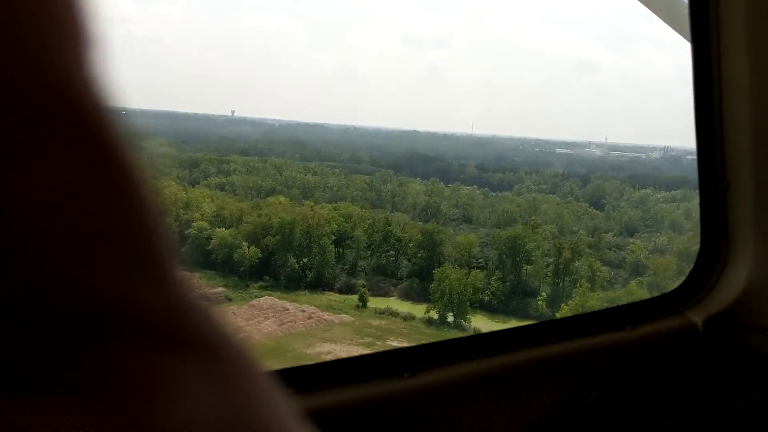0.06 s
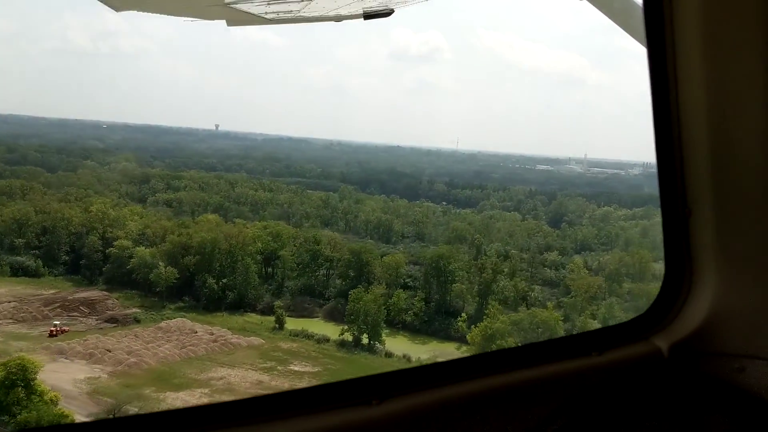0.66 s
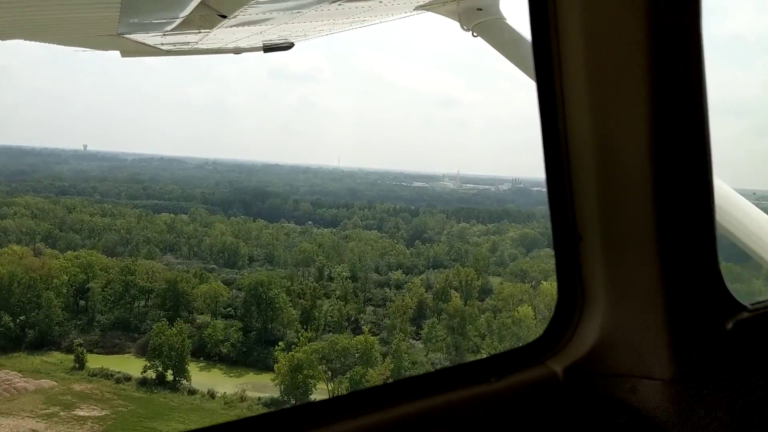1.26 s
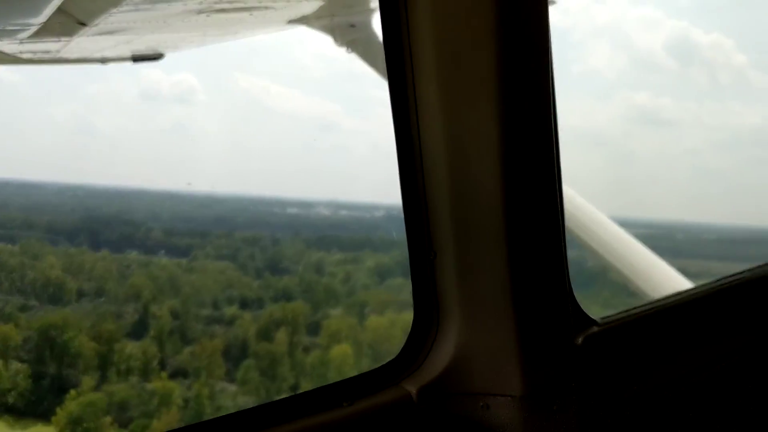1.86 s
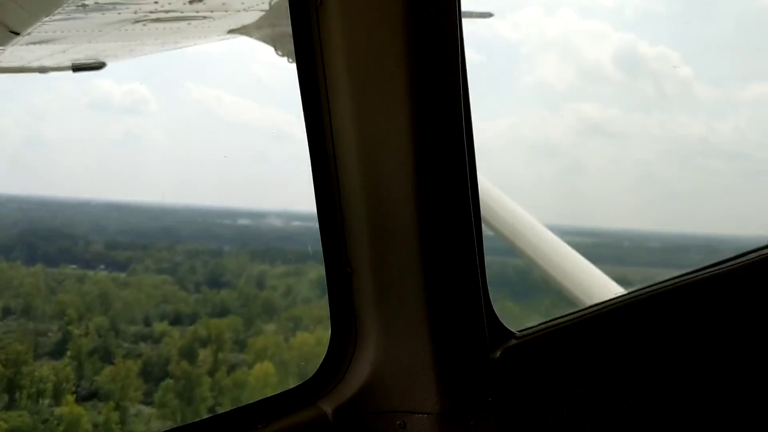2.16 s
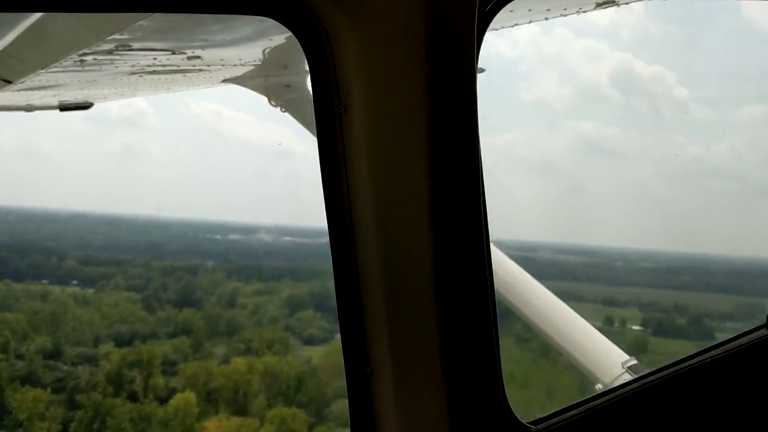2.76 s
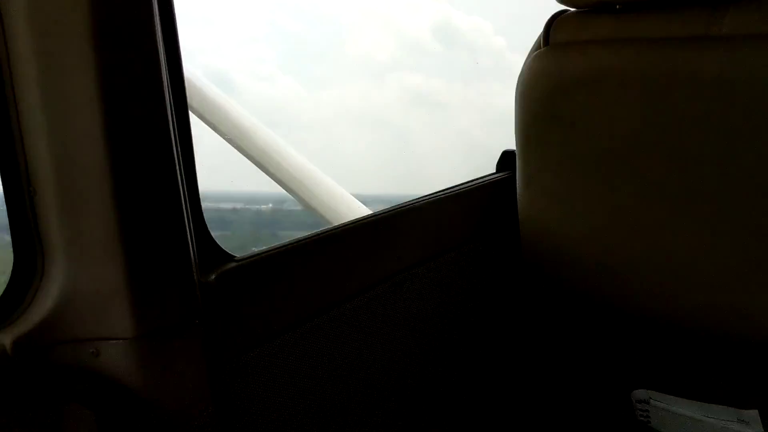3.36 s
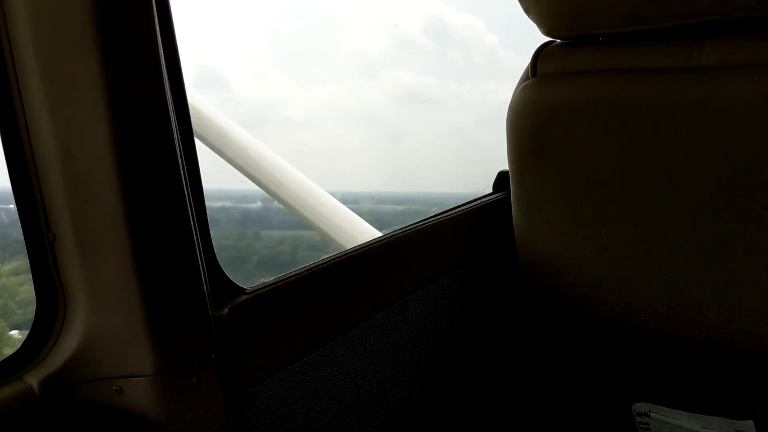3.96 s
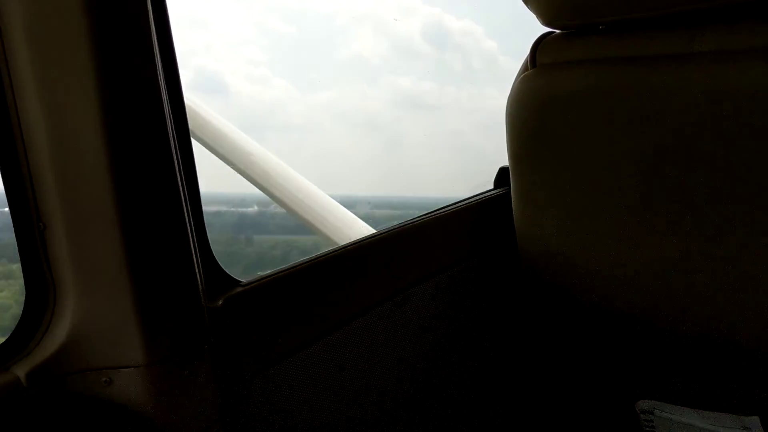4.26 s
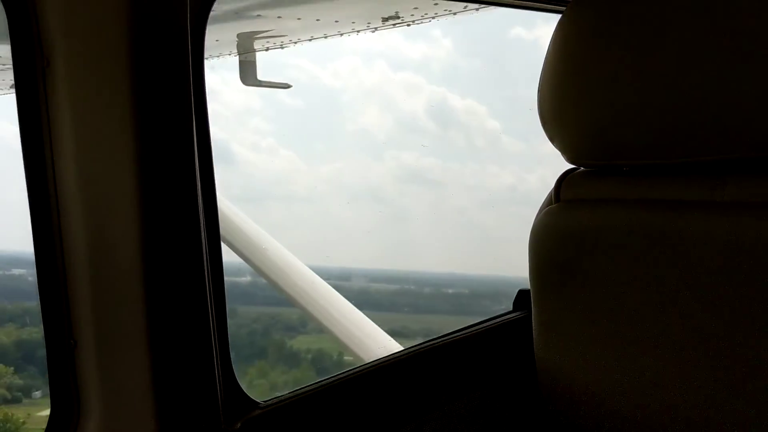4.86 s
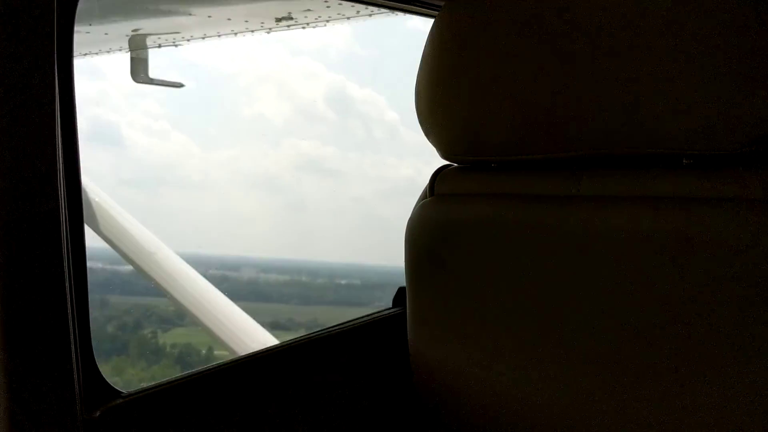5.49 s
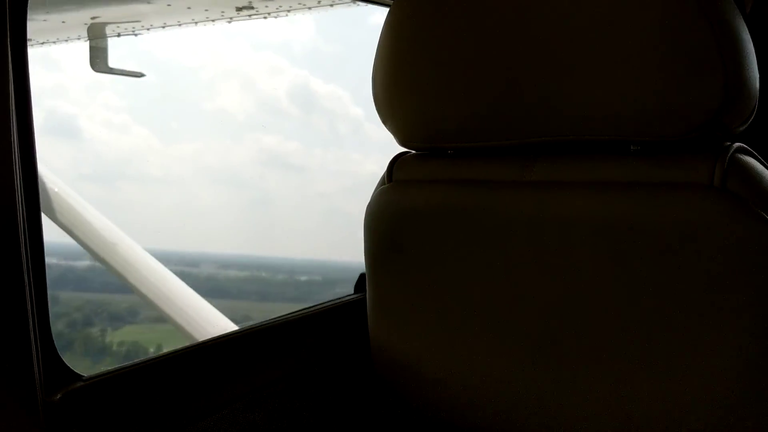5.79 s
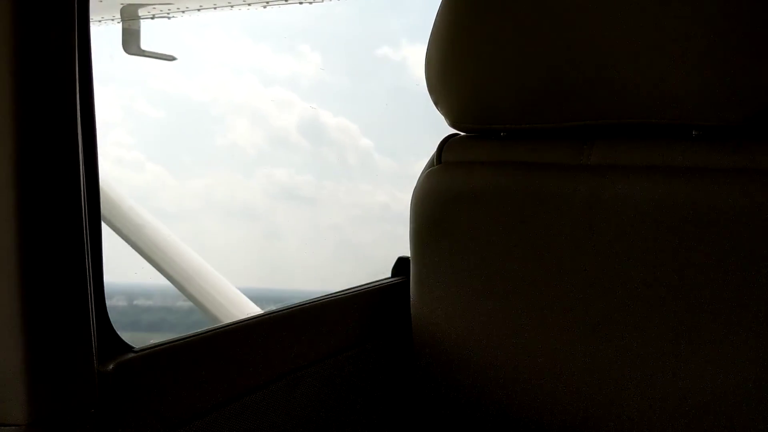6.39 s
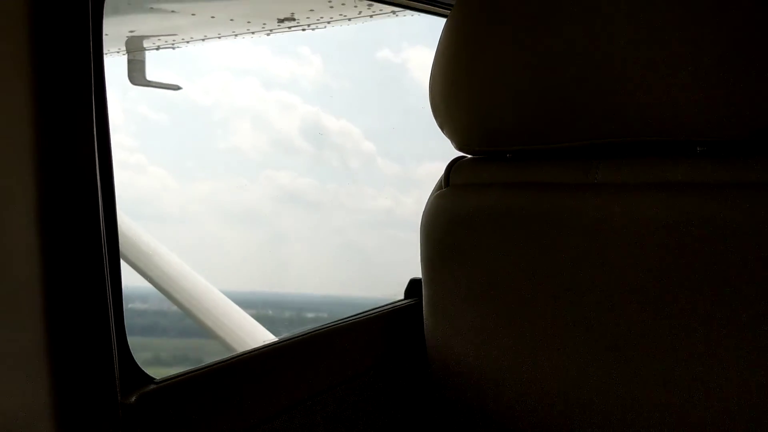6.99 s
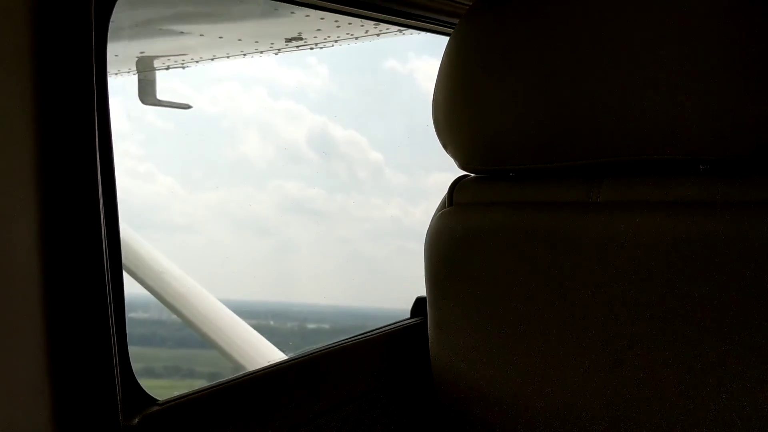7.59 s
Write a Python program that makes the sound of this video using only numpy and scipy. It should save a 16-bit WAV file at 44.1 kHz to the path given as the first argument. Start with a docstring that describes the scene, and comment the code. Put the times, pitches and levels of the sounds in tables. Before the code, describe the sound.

Inside a light aircraft in flight, a loud, deep propeller hum and engine rumble hold steady, with airflow rushing and faintly hissing.

```python
"""Light aircraft cabin, climbing

A four-cylinder engine turns near 2400 rpm. Two propeller blades and two firings per turn give one deep
hum, whose overtones swell and sink as the microphone is carried through the cabin's standing waves.
The exhaust rumbles, the slipstream rushes over the skin and air hisses through the seals;
the recorder's automatic gain lifts them whenever the hum sinks."""
import sys
import numpy as np
from scipy import signal
from scipy.fft import rfft, irfft
from scipy.io import wavfile

SR = 44100
rng = np.random.default_rng(int(sys.argv[2]) if len(sys.argv) > 2 else 0)


def wav_out(sig):
    """Save sig, one row per channel (or a flat mono array), as 16-bit PCM at SR to the path in sys.argv[1]."""
    wavfile.write(sys.argv[1], SR, np.round(np.clip(np.atleast_2d(sig).T, -1, 1) * 32767).astype(np.int16))


N = 341334
TIME = np.arange(N) / SR
BIN_HZ = np.arange(N // 2 + 1) * SR / N


def undb(db):
    """Decibels to gain."""
    return 10 ** (np.asarray(db) / 20)


def curves(table):
    """Automation lanes: each column of a table, joined by straight lines in time."""
    times, *columns = np.transpose(table)
    return [np.interp(TIME, times, column) for column in columns]


def walk(rate):
    """Slow random modulation: rate new values a second, joined by straight lines; spread near 1."""
    place = TIME * rate + rng.random()
    steps = rng.standard_normal(int(place[-1]) + 2)
    return np.sqrt(3 / 2) * np.interp(place, np.arange(len(steps)), steps)


def tone(cycles):
    """A sine of rms 1."""
    return np.sqrt(2) * np.sin(2 * np.pi * cycles)


def rush(spectrum, pulsing):
    """Pulsed turbulence, coloured by its path and the faint ripple of many cabin resonances; rms 1."""
    noise = pulsing * rng.standard_normal(N)
    hz = np.maximum(BIN_HZ, 1)
    points_hz, points_db = np.transpose(spectrum)
    eq_db = np.interp(np.log(hz), np.log(points_hz), points_db)
    modes_hz = np.arange(0, SR / 2, 20)
    ripple = np.interp(hz, modes_hz, rng.standard_normal(len(modes_hz)))
    ripple_db = 1.6 * ripple * np.minimum(hz / 800, 1)
    coloured = irfft(rfft(noise) * undb(eq_db + ripple_db), N)
    return coloured / coloured.std()


# the microphone's aim, from rear window (0) to door and seat back (1): (time [s], turn [0-1])
MIC_TURN = [(0, 0.19), (1.3, 0), (2.75, 0.39), (3.4, .76), (4.4, 1), (5.2, 0.86), (5.9, 0.6), (6.5, 0.51),
            (7.74, 0.63)]
def facing_gain(rear_db, turn_db):
    """A layer's fader: rear_db facing the rear window, changing by turn_db over the full turn."""
    turn, = curves(MIC_TURN)
    return undb(rear_db + turn_db * turn)


# colour of the finest hiss: (frequency [Hz], level [dB])
GAP_EQ = [(5000, -31), (8300, -11), (9300, 3), (10200, 6), (11300, 1), (12200, 0), (13700, -7),
          (14800, -10.5), (15700, -4.5)]
def gap_hiss(pump):
    """Air in the narrowest gaps adds a fine sheen, easily shaded by the seats."""
    return facing_gain(rear_db=-48.5, turn_db=-2) * rush(GAP_EQ, pump)


# colour of the door leak, peaking near 7 kHz: (frequency [Hz], level [dB])
DOOR_EQ = [(3000, -40), (4350, -16), (5000, -2), (5550, -12), (6200, -2.5), (6700, -2), (7050, 4),
           (7400, 3.5), (7800, -3.5), (8300, -6), (10100, -10.5), (11400, -28), (16000, -35)]
def door_leak(pump):
    """Air squeezes through the door seal in a thin, bright hiss."""
    return facing_gain(rear_db=-48, turn_db=4) * rush(DOOR_EQ, pump)


# the vent's resonance: (frequency [Hz], level [dB])
VENT_EQ = [(3000, -41), (4300, -10), (4700, 1.5), (4850, 2.5), (5100, -2.5), (5500, -9), (8000, -44)]
# the whistle's fader: (time [s], level [dB])
VENT_FADER = [(0, -45), (1.7, -48), (2.2, -49), (3.05, -48), (3.5, -46), (4.0, -48), (5.0, -50),
              (6.0, -46.5), (7.74, -49.5)]
def vent_whistle(pump):
    """Air over a vent edge rings as a breathy whistle."""
    level_db, = curves(VENT_FADER)
    return undb(level_db) * rush(VENT_EQ, pump)


# colour of the window leak: (frequency [Hz], level [dB])
WINDOW_EQ = [(1500, -27), (3000, 3.5), (3600, 4.5), (4300, 3), (4850, -3), (5300, 2), (5800, -2),
             (6600, -3.5), (8200, -50), (16000, -40)]
def window_leak(pump):
    """Air hisses past the side window, softer as the microphone turns to the door."""
    return facing_gain(rear_db=-40.5, turn_db=-6.5) * rush(WINDOW_EQ, pump)


# midrange colour of the wash: (frequency [Hz], level [dB])
WASH_EQ = [(400, -19), (650, -8.5), (760, -4.5), (970, 2), (1100, -6.5), (1400, -16), (3000, -48)]
# the wash's fader: (time [s], level [dB])
WASH_FADER = [(0, -38), (.6, -37.5), (1.6, -40.5), (2.35, -47.5), (2.8, -41.5), (3.4, -44.5), (4.5, -47),
              (5.3, -42.5), (7.74, -44)]
def propeller_wash(slap):
    """The blades' wakes beat on the windscreen."""
    level_db, = curves(WASH_FADER)
    return undb(level_db) * rush(WASH_EQ, slap)


# colour of the slipstream: (frequency [Hz], level [dB])
SLIPSTREAM_EQ = [(100, 5), (700, 3.5), (1000, -2.5), (1150, 0.5), (1750, 0.9), (2300, -1.5), (2650, -4.5),
                 (2900, -2), (3400, -14), (4200, -35), (8000, -20.5), (16000, -44)]
def slipstream(pump):
    """Air rushing over the skin lays a broad bed of noise."""
    return facing_gain(rear_db=-33.5, turn_db=1.46) * rush(SLIPSTREAM_EQ, pump)


# engine speed: (time [s], crankshaft rate [Hz])
ENGINE_SPEED = [(0, 40.44), (1.1, 40.1), (1.7, 40.3), (2.5, 40.86), (3.3, 39.82), (4.2, 40.28),
                (5.3, 40.02), (6.4, 40.82), (7.2, 40.56), (7.74, 40.2)]
def crankshaft():
    """Turns made so far; uneven combustion makes the speed wobble a little."""
    hz, = curves(ENGINE_SPEED)
    return np.cumsum(hz * (1 + .0005 * walk(9))) / SR


# the hand-held microphone's wander: (time [s], along the cabin [m], across it [m])
MIC_POSITION = [(0.0, -0.0046, -0.0061), (0.65, -0.023, 0.022), (1.37, 0.026, -0.0082), (1.63, 0.09, 0.097),
                (1.98, 0.044, 0.023), (2.3, 0.13, 0.021), (2.98, 0.062, -0.0029), (3.12, 0.078, -0.24),
                (3.45, 0.0084, -0.039), (3.71, 0.076, -0.13), (4.05, 0.0082, -0.0046),
                (4.56, 0.002, -0.021), (5.27, 0.13, -0.148), (5.65, 0.17, -0.015), (6.1, 0.18, 0.017),
                (6.26, -0.045, -0.0047), (6.9, 0.081, -0.0022), (7.14, 0.028, 0.0092),
                (7.74, 0.079, -0.021)]
# the hum's overtones as standing waves:
# (blade harmonic [number], crest level [dB], direction [deg], node place [m], node against crest [dB])
CABIN_WAVES = [(2, -14.7, 136, -.213, -30), (3, -25.8, 17, -.032, -28), (4, -25.8, 84, .07, -17),
               (5, -24.9, 174, -.108, -20), (6, -34.8, 76, .111, -13), (7, -41.5, 184, -.135, -22),
               (9, -45, 228, -.066, -10), (10, -45.5, 118, -.081, -18), (11, -48, 236, -.065, -13)]
def standing_waves(blade_hz, sound_m_s=343):
    """Per overtone (harmonic, crest dB, swell): the swell dips at nodes half a wavelength apart."""
    along, across = curves(MIC_POSITION)
    waves = []
    for harmonic, crest_db, degrees, node_m, node_db in CABIN_WAVES:
        angle = np.radians(degrees)
        from_node_m = along * np.cos(angle) + across * np.sin(angle) - node_m
        pressure = np.sin(2 * np.pi * from_node_m * harmonic * blade_hz / sound_m_s)
        waves.append((harmonic, crest_db, np.hypot(pressure, undb(node_db))))
    return waves


# the engine's weaker partials: (multiple of the crankshaft rate [ratio], level [dB])
ENGINE_PARTIALS = [(2.5, -30.9), (3.5, -39.8), (12.5, -51.5), (13.5, -53.3), (14.5, -56.0), (15.5, -54.3),
                   (16.0, -52.7), (16.5, -46.6), (17.5, -54.0), (18.5, -52.8), (19.0, -52.5), (20.5, -55.4),
                   (24.0, -55.0), (26.0, -56.7), (26.5, -58.3), (28, -54.5), (30.5, -56.5), (36.0, -57.6)]
def engine_tones(turns):
    """Unequal cylinders and shaking panels add faint tones; the higher ones drift and fade more."""
    out = 0
    for multiple, db in ENGINE_PARTIALS:
        unrest = np.log10(multiple) + .5
        drift = rng.random() + .025 * unrest * walk(8)
        fade_db = 1.6 * unrest * walk(3)
        out = out + undb(db + fade_db) * tone(multiple * turns + drift)
    return out


# each cylinder's accent, in firing order: (level [dB])
CYLINDER_ACCENTS = [0.86, 1.2, -0.66, -1.1]
def firings(turns, decay=0.63, floor=0.83):
    """Each firing sends a puff of pressure; the four cylinders differ, so it throbs every two turns."""
    firing, age = np.divmod(2 * turns, 1)  # age and decay count in firing intervals
    accent = undb(CYLINDER_ACCENTS)[firing.astype(int) % len(CYLINDER_ACCENTS)]
    return accent * (floor + np.exp(-age / decay))


# colour of the exhaust through the floor: (frequency [Hz], level [dB])
EXHAUST_EQ = [(8, -48), (20, -25), (32, -29), (48, -13), (64, 0), (95, -1.5), (135, 2), (175, -2),
              (205, -7), (275, -7), (350, -8), (490, -12), (610, -20.5), (720, -17), (1100, -48.5)]
def exhaust(turns, blade_hz, waves, standing_share=0.17):
    """Rough gas rumbles firing by firing; near each overtone, part of its power rides that wave."""
    rumble = rush(EXHAUST_EQ, firings(turns))
    spectrum = rfft(rumble)
    for harmonic, _, swell in waves:
        band = irfft(spectrum * np.maximum(1 - abs(BIN_HZ / blade_hz - harmonic), 0), N)
        power = 1 - standing_share + standing_share * swell ** 2 / np.mean(swell ** 2)
        rumble = rumble + band * (np.sqrt(power) - 1)
    return facing_gain(rear_db=-24.5, turn_db=-2) * rumble


def blade_tone(turns, harmonic):
    """One harmonic of the blade rate; gusts shake it a little, and shorter waves fade in and out."""
    scatter = .07 * (harmonic - 1) * rng.standard_normal()  # cabin reflections shift the phase
    flutter_db = 0.6 * np.log(1 + harmonic) * walk(14)
    fade_db = 0.11 * (harmonic - 1) * walk(4)
    sway = 0.0038 * harmonic * walk(4)
    return undb(flutter_db + fade_db) * tone(2 * harmonic * turns + scatter + sway)


# the fader of the hum's fundamental: (time [s], level [dB])
HUM_FADER = [(0, -10.5), (.25, -11), (.9, -11.5), (1.3, -10), (1.47, -14.5), (1.7, -13.2), (1.97, -10.5),
             (2.4, -11.5), (2.75, -13.5), (3.2, -11), (3.45, -10.5), (4.6, -10.5), (5.35, -11.3),
             (5.7, -14.4), (5.95, -13.5), (6.23, -11), (7.1, -10.5), (7.74, -12)]
def propeller_hum(turns, waves):
    """The deep hum at the blade rate, with overtones that swell and sink in their standing waves."""
    level_db, = curves(HUM_FADER)
    hum = undb(level_db) * blade_tone(turns, 1)
    for harmonic, crest_db, swell in waves:
        hum = hum + undb(crest_db) * swell * blade_tone(turns, harmonic)
    return hum


def scene():
    """The mono cabin mix: engine and propeller over a bed of airflow."""
    turns = crankshaft()
    blade_hz = 2 * turns[-1] / TIME[-1]  # mean blade rate
    waves = standing_waves(blade_hz)
    rumble = exhaust(turns, blade_hz, waves)
    engine = propeller_hum(turns, waves) + engine_tones(turns) + rumble
    # each blade's wake slaps the windscreen and pumps the other airflow more lightly
    wake = np.cos(2 * np.pi * 2 * turns)
    slap, pump = 1 + 0.094 * wake, 1 + 0.071 * wake
    outer_air = propeller_wash(slap) + slipstream(pump)
    leaks = window_leak(pump) + vent_whistle(pump) + door_leak(pump) + gap_hiss(pump)
    gust = undb(.22 * walk(10))  # small gusts move all the airflow together
    return (engine + gust * (outer_air + leaks))[None]


def automatic_gain(mix, target_db=-11, average_s=0.12, ratio=5.3):
    """A compressor rides the mean power, so the rush of air swells whenever the deep hum sinks."""
    pole = np.exp(-1 / (average_s * SR))
    excess = (mix / undb(target_db)) ** 2 - 1
    power = 1 + signal.lfilter([1 - pole], [1, -pole], excess)
    return mix * np.sqrt(power) ** (1 / ratio - 1)


def record(dry, fade_s=.004, top_hz=15650):
    """The recorder evens out the level, opens and closes softly and cuts the top steeply."""
    fade = np.clip(np.minimum(TIME, TIME[-1] - TIME) / fade_s, 0, 1)
    high_cut = signal.ellip(12, .1, 90, top_hz, fs=SR, output="sos")
    return signal.sosfilt(high_cut, automatic_gain(dry) * fade)


dry = scene()
out = record(dry)
wav_out(out)
```